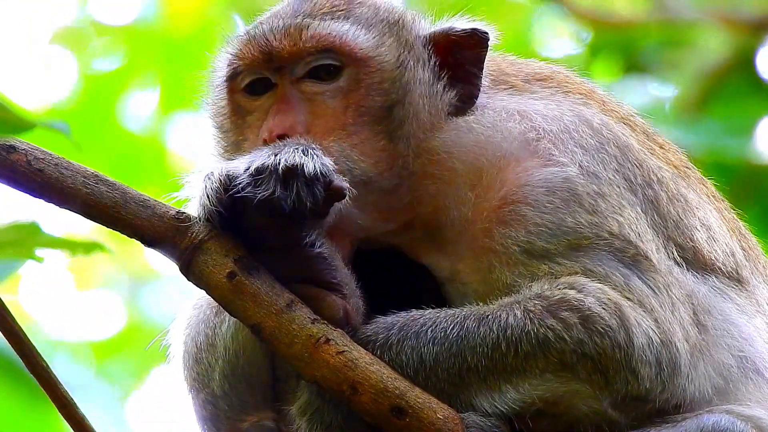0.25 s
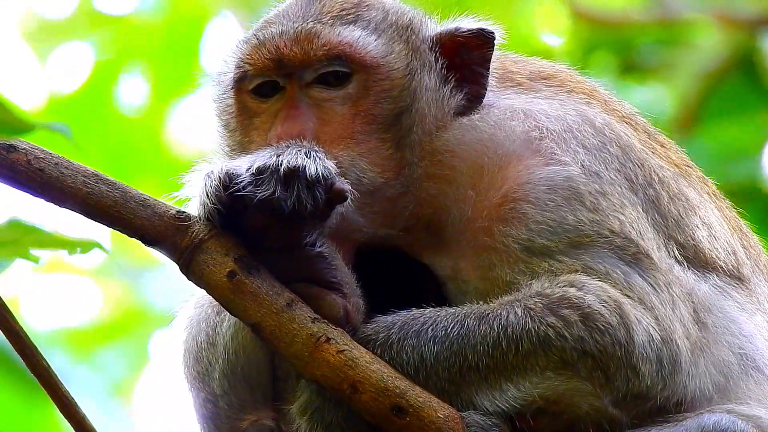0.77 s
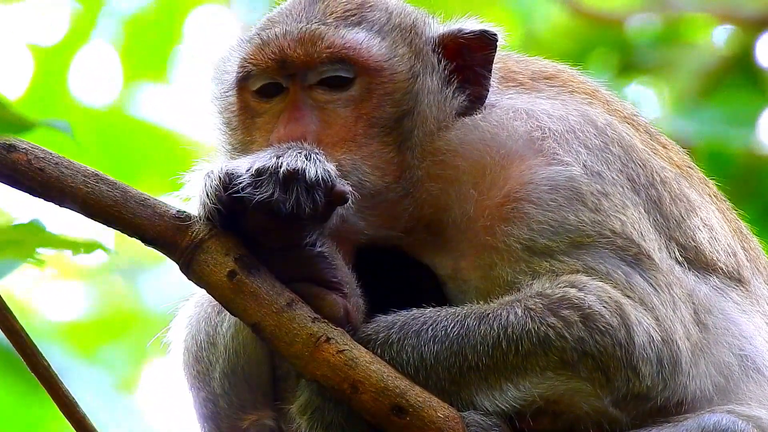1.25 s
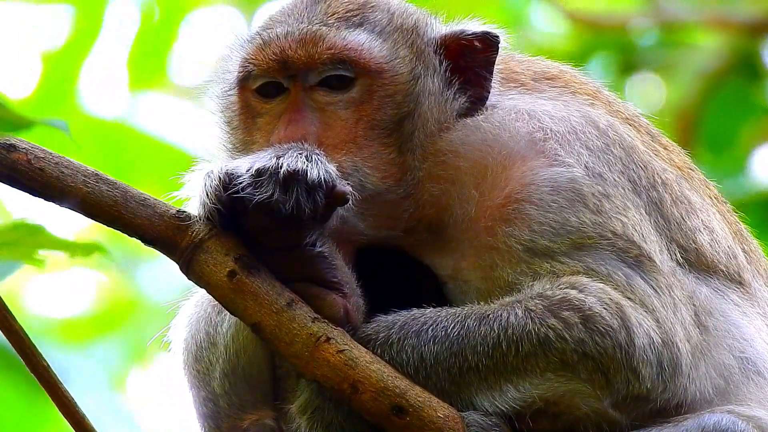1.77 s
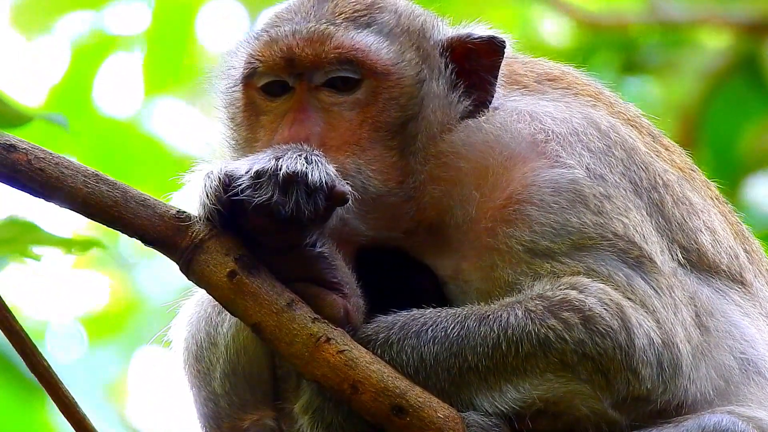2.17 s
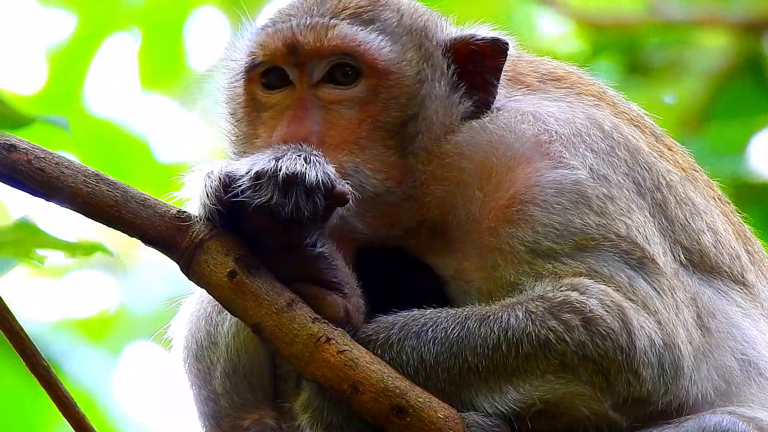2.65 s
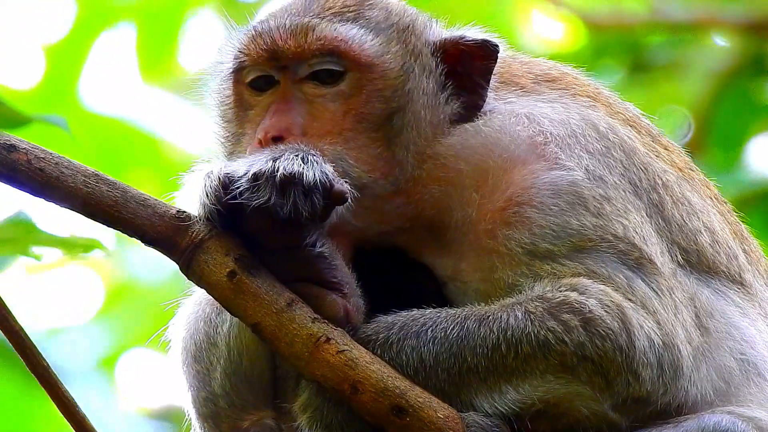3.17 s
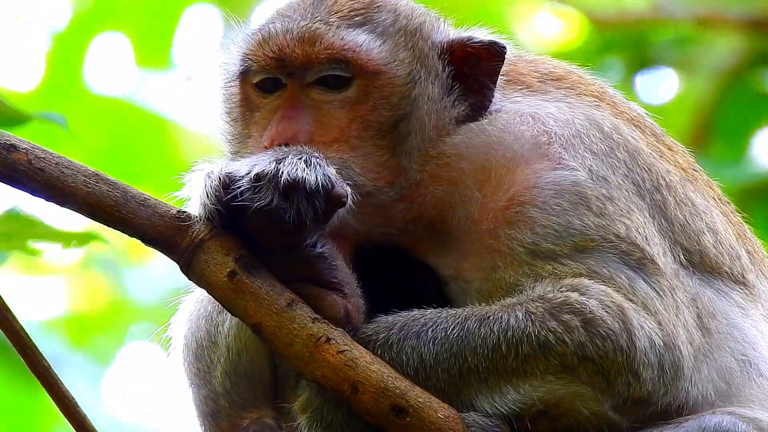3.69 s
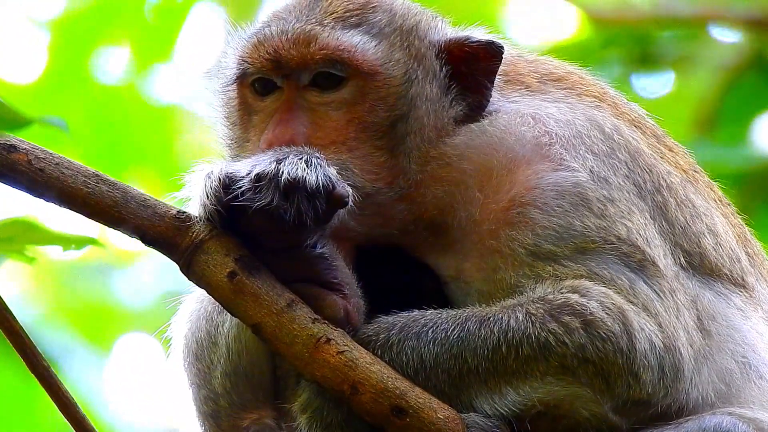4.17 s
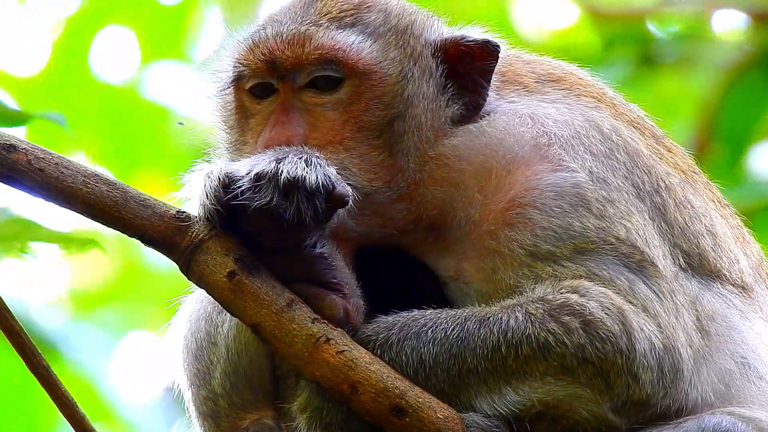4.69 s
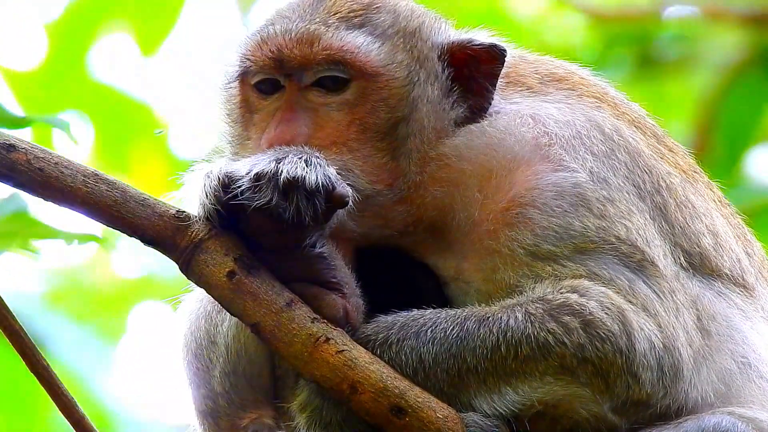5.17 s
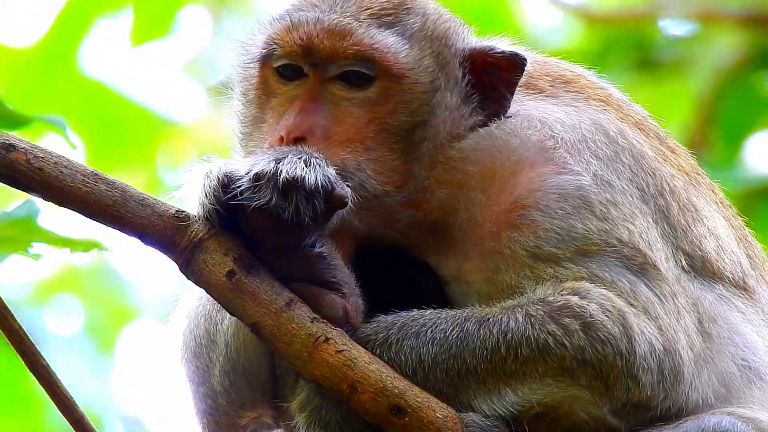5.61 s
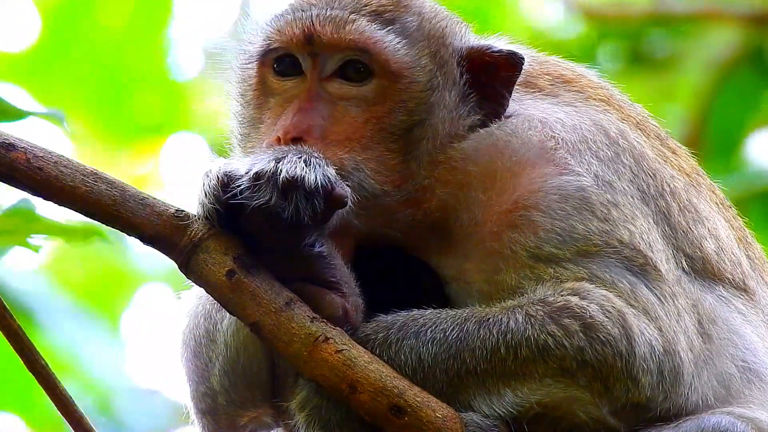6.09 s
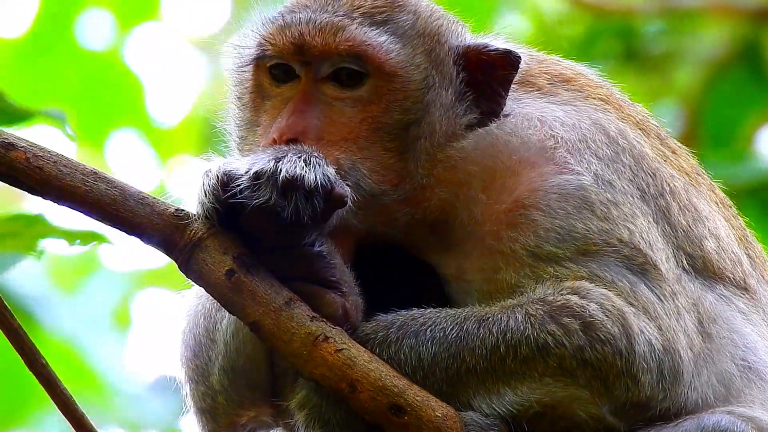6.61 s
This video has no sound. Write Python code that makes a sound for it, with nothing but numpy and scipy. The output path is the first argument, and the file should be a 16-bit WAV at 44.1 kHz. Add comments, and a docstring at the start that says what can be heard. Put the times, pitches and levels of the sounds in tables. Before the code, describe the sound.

A wide, bright insect drone dominates throughout, with a closer rhythmic throb on top. Soft lip smacks come in small clusters, followed by a clear bird cry, before an abrupt half-second silence. The drone returns a little stronger, with a few more smacks, another cry, scattered echoing whistles, thin high lisps and crackling leaves. Light wind rumbles low beneath, captured in open woodland with a diffuse, leafy echo.

```python
"""A shrill insect chorus fills a forest, with one nearer insect throbbing about four times a second.
Far birds whistle through the trees, a monkey smacks its lips, leaves rustle and light wind rumbles.
Insects are filtered clicks and noise, birds gliding sines with a scattered tail, smacks bursts shaped
by mouth resonances, leaves and wind coloured noise.
The sound cuts out for half a second and comes back a little louder."""
import sys
import numpy as np
from scipy import signal
from scipy.fft import rfft, irfft, next_fast_len
from scipy.io import wavfile
from scipy.ndimage import uniform_filter1d

SR = 44100
rng = np.random.default_rng(int(sys.argv[2]) if len(sys.argv) > 2 else 0)


def store_wav(level_fs):
    """Save 16-bit WAV to argv[1]."""
    pcm = np.round(np.clip(np.atleast_2d(level_fs), -1, 1) * 32767)
    wavfile.write(sys.argv[1], SR, pcm.T.astype(np.int16))


N = 302085
TIME = np.arange(N) / SR

# Mean levels of the steady layers, joined by straight lines.
# Each row: time in seconds, insect chorus in dB, forest wash in dB, wind in dB.
LAYER_LEVELS = [(0, -41, -58, -45), (1, -40.5, -56, -48.5), (2.501, -40.5, -54, -46),
                (2.999, -37.5, -56, -44.5), (4.3, -38, -56, -46), (5.5, -37.5, -54.5, -46),
                (6.85, -38.5, -56.5, -44.5)]


def gain_of(db):
    """Decibels to amplitude."""
    return 10 ** (np.asarray(db) / 20)


def evened(x):
    """Scales to rms 1."""
    return x / np.sqrt(np.mean(x ** 2) + 1e-20)


def read(points, hz):
    """Reads a curve of (Hz, value) points on a log-frequency axis."""
    f, value = np.transpose(points)
    return np.interp(np.log(hz + 1), np.log(f + 1), value)


def add(mix, s, sound):
    """Mixes a sound in at time s."""
    part = mix[max(round(s * SR), 0):][:len(sound)]
    part += sound[:len(part)]


def sine(hz):
    """A sine that follows a moving pitch."""
    return np.sin(2 * np.pi * np.cumsum(hz) / SR)


def noise_pair():
    """Two unrelated channels of white noise."""
    return rng.standard_normal((2, N))


def wander(rate_hz):
    """Smooth chance of rms 1, moving up to roughly the given rate."""
    size = next_fast_len(N)
    hz = np.fft.rfftfreq(size, 1 / SR)
    slow = rfft(rng.standard_normal(size)) * np.exp(-(hz / rate_hz) ** 2)
    return evened(irfft(slow, size)[:N])


def spread(pair, spectrum):
    """Colours two unrelated signals and makes them partly alike, as sound from all around."""
    # Stereo width over pitch. Each row: frequency in Hz, left-right likeness (1 alike, negative opposed).
    likeness = [(60, 1), (200, 0.8), (450, 0.53), (900, 0.6), (3300, 0.44), (4500, 0.54), (6400, 0.27),
                (8200, -0.03), (9800, -0.32), (12000, -.33), (15000, .15)]
    size = next_fast_len(N)
    hz = np.fft.rfftfreq(size, 1 / SR)
    a, b = rfft(pair, size)
    same = np.clip(read(likeness, hz), -1, 1)
    z = np.array([a, same * a + np.sqrt(1 - same ** 2) * b])
    z = z * gain_of(read(spectrum, hz))
    return evened(irfft(z, size)[:, :N])


def arch(s, length, edge):
    """Sample indices and soft-edged envelope of one event."""
    at = np.arange(int(s * SR), min(int((s + length) * SR), N))
    return at, signal.windows.tukey(len(at), min(edge, 1))


def trees(x, t60, wet_db, same):
    """Trunks and leaves scatter a sound into a long tail of sparse random echoes."""
    t = TIME[:SR]
    echoes = rng.standard_normal((2, SR)) * (rng.random((2, SR)) < .1)
    a, b = echoes * gain_of(-60 * t / t60)
    same = np.clip(same, 0, 1)
    tail = np.array([a, same * a + np.sqrt(1 - same ** 2) * b])
    tail = tail * gain_of(wet_db) / np.linalg.norm(a)
    tail[:, 0] += 1  # the direct sound
    return signal.fftconvolve(x[None], tail / np.linalg.norm(tail[0]), axes=1)[:, :N]


def patchy(x, patchy_db, order=9):
    """Many faint far voices come and go: narrow patches of the spectrum swell and sink."""
    z = signal.stft(x, nperseg=1024, noverlap=768)[2]
    field = rng.standard_normal(z.shape[1:])
    field = uniform_filter1d(field, size=order, axis=1)  # smooth in time
    field = evened(uniform_filter1d(field, size=3, axis=0))  # and in frequency
    patches = z * gain_of(patchy_db * field)
    return evened(signal.istft(patches, nperseg=1024, noverlap=768)[1][:, :N])


def drones():
    """Distant tones of slightly unsteady pitch that fade in and out."""
    # Faint far tones. Each row: start in seconds, length in seconds, pitch in Hz,
    # peak level in dB before the shared wavering, pitch scatter in Hz.
    tones = [(0, 1.96, 816, -63.5, 18.4), (0, 1.25, 118.7, -48.5, 6.5), (3.4, 3.2, 205.2, -59.5, 9.03),
             (5.694, 1.9, 645, -62.5, 16.2)]
    out, waver = np.zeros(N), wander(45.7)
    for s, length, hz, db, scatter in tones:
        at, shape = arch(s, length, 0.091)
        out[at] += gain_of(db) * shape * sine(hz + scatter * waver[at])
    return out * gain_of(4.6 * wander(9.8))


def air():
    """Lumpy low wind under the soft, uneven wash of the forest."""
    # Colour of the low wind. Each row: frequency in Hz, relative level in dB per Hz.
    wind_colour = [(18, -18), (35, -21), (55, -5.5), (75, -0.5), (105, 0), (125, -1.5), (142, -7),
                   (165, -7), (188, -7), (205, -6), (235, -17.5), (330, -24.5), (700, -49)]
    # Colour of the forest wash. Each row: frequency in Hz, relative level in dB per Hz.
    forest_colour = [(100, -5.5), (290, -0.5), (400, 0.5), (640, 0.5), (760, -1.5), (900, -4.5), (1100, -4),
                     (1500, -7), (2100, -5.5), (2700, -6), (3500, -5), (6000, -39)]
    # Low swells and bumps. Each row: start in seconds, length in seconds, pitch in Hz, level in dB.
    low_bumps = [(1.6, 0.43, 97.4, -43), (2.215, 0.055, 160.4, -43), (3.08, 0.057, 160, -35),
                 (3.16, 0.079, 161, -44.5)]
    s, _, forest_db, wind_db = np.transpose(LAYER_LEVELS)
    wash = patchy(spread(noise_pair(), forest_colour), patchy_db=4.0)
    wash = wash * gain_of(np.interp(TIME, s, forest_db) + 1.0 * wander(9.8))
    wind = spread(noise_pair(), wind_colour)
    wind = wind * gain_of(np.interp(TIME, s, wind_db) + 1.0 * wander(33))
    for s, length, hz, db in low_bumps:
        at, shape = arch(s, length, 0.63)
        tone = np.sin(2 * np.pi * hz * (TIME[at] - s))
        wind[:, at] += gain_of(db) * shape * evened(tone)
    return wash + wind + drones()


def leaves():
    """Brushed leaves give clumps of fine crackle that swell and die away."""
    # Strokes through the leaves. Each row: start in seconds, time to the crest in seconds,
    # crest level in dB before the crackle.
    brushes = [(1.19, 0.035, -55), (2.036, 0.0058, -49), (3.49, .15, -53.5), (5.33, 0.031, -44),
               (5.367, 0.0072, -42.5), (5.43, 0.03, -50), (6.09, 0.13, -51)]
    # Colour of the leaves. Each row: frequency in Hz, relative level in dB per Hz.
    leaf_colour = [(400, 0.5), (1400, -13.5), (2800, -5), (4200, -9.5), (5700, 8.5), (6900, 4), (8200, -9),
                   (11000, -19), (16000, -48.5)]
    level = np.zeros(N)
    for s, crest, db in brushes:
        age = np.maximum(TIME - s, 0) / crest
        level += gain_of(db) * (age * np.exp(1 - age)) ** 0.76  # below 1 broadens the swell
    return spread(noise_pair(), leaf_colour) * level * gain_of(2.8 * wander(120))


def smacks():
    """Parting lips release a brief wet burst into the hollow of the mouth."""
    # Lip smacks. Each row: start in seconds, dry level in dB, decay in seconds,
    # factor on the mouth resonances.
    lip_smacks = [(1.316, -47.5, 0.0073, 1), (1.405, -40.5, 0.0024, 1.12), (1.476, -45.5, 0.0067, 1),
                  (1.499, -47.5, 0.018, 0.71), (2.03, -36, .0035, 1.06), (2.224, -35.5, 0.0026, 1.06),
                  (2.322, -37.5, 0.0062, 0.956), (3.104, -47.5, 0.0035, .96), (3.144, -38, 0.0028, 1.13),
                  (5.372, -43, 0.0042, 1.43), (6.38, -46.5, 0.0098, 0.95)]
    # Resonances of the mouth. Each row: centre in Hz before that factor, width in Hz, relative level in dB.
    resonances = [(585, 190, 0), (881, 110, 10.5), (1130, 330, -3.5), (1596, 300, -10.5),
                  (2000, 610, -18.5)]
    out, t = np.zeros(N), TIME[:8192]
    hz = np.fft.rfftfreq(len(t), 1 / SR)
    for s, db, decay, factor in lip_smacks:
        mouth = sum(gain_of(d) / (1 + (2 * (hz - f * factor) / w) ** 2) for f, w, d in resonances)
        random_phase = np.exp(2j * np.pi * rng.random(len(hz)))
        burst = evened(irfft(mouth * random_phase))
        add(out, s, gain_of(db) * burst * t / decay * np.exp(1 - t / decay))
    return trees(out, t60=0.2, wet_db=-7, same=0.64)


def buzzes():
    """Thin, high lisping notes whose pitch flutters too fast to follow."""
    # High lisps. Each row: start in seconds, length in seconds, pitch in Hz,
    # level in dB before the trees.
    lisps = [(1.04, 0.074, 6640, -52), (1.27, 0.08, 6660, -52), (2.294, 0.11, 6600, -54.5),
             (2.981, 0.055, 6400, -55), (4.46, .075, 6600, -56), (4.742, 0.27, 6660, -47),
             (4.987, 0.2, 6790, -47)]
    out, flutter = np.zeros(N), wander(790)
    for s, length, hz, db in lisps:
        at, shape = arch(s, length, 0.19)
        out[at] += gain_of(db) * shape * evened(sine(hz + 175 * flutter[at]))
    return trees(out, t60=0.68, wet_db=4.0, same=.3)


def distant_birds():
    """Faint short notes from deep in the forest, in spells, each at its own pitch."""
    # Spells of answering notes. Each row: start in seconds, end in seconds, notes in the spell,
    # lowest base pitch in Hz, highest base pitch in Hz, loudest level in dB before the trees.
    note_spells = [(1.001, 1.4, 4.5, 2300, 2560, -54), (3.1, 3.701, 6, 2090, 3110, -54),
                   (3.6, 6.751, 56, 1046, 3134, -54.5)]
    note_s, glide_share, range_db, rasp_hz = .09, .126, 12, 25
    out, waver = np.zeros(N), wander(200)
    for start, end, notes, low_hz, high_hz, db in note_spells:
        chances = rng.random(size=(100, 4))[:round(notes)]
        for k, (when, pitch, glide, size) in enumerate(chances):
            s = start + (k + when) / notes * (end - start)
            at, shape = arch(min(s, TIME[-1] - note_s), note_s, 0.81)
            base_hz = low_hz * (high_hz / low_hz) ** pitch
            hz = base_hz * (1 + glide_share * (glide - .5) * np.linspace(-1, 1, len(at)))
            out[at] += gain_of(db - range_db * size) * shape * sine(hz + rasp_hz * waver[at])
    return trees(out, t60=1.0, wet_db=0.5, same=0.94)


def birds():
    """Far whistles and cries, gliding sines roughened by pitch scatter and smeared by the trees."""
    # The clearest whistles. Each row: start in seconds, length in seconds, first pitch in Hz,
    # last pitch in Hz, level in dB before the trees, rasp as pitch scatter in Hz.
    whistles = [(0.861, 0.37, 2735, 2735, -63, 51), (1.388, 0.14, 2554, 2615, -55.5, 40),
                (1.513, 0.26, 2720, 2835, -58.5, 55), (1.524, .39, 3025, 3380, -61, 45),
                (2.259, 0.13, 2630, 2120, -57, 170), (2.934, .11, 3930, 3775, -44.5, 64),
                (3.055, 0.38, 3182, 2963, -54, 47), (3.293, 0.1, 2713, 2670, -48.5, 16),
                (3.742, .11, 3080, 3110, -54.5, 20), (3.805, .29, 2660, 2840, -59.5, 38),
                (4.58, 0.066, 2180, 2510, -53.5, 160), (5.017, .11, 2730, 2400, -55.5, 33),
                (5.145, 0.032, 2306, 2220, -49.5, 25), (5.16, 0.47, 3103, 3075, -55, 79),
                (5.397, 0.37, 4180, 3975, -49.5, 86), (5.62, 0.072, 1185, 1160, -54.5, 8.1),
                (6.645, 0.083, 2455, 2357, -50.5, 30), (6.793, .09, 1750, 1560, -52.5, 28)]
    # Loud calls of one bird. Each row: start in seconds, length in seconds, middle pitch in Hz,
    # level in dB before swell and trees, rasp as pitch scatter in Hz.
    loud_cries = [(2.086, 0.1496, 1659, -38.5, 24.95), (4.39, 0.1154, 1681, -35.5, 42.7)]
    out, waver = np.zeros(N), wander(255)
    for s, length, first_hz, last_hz, db, rasp in whistles:
        at, shape = arch(s, length, 0.082)
        hz = np.linspace(first_hz, last_hz, len(at)) + rasp * waver[at]
        out[at] += gain_of(db) * shape * evened(sine(hz))
    for s, length, pitch_hz, db, rasp in loud_cries:
        at, shape = arch(s, length, 0.24)
        hz = pitch_hz + np.linspace(22, -22, len(at)) + rasp * waver[at]
        shape = shape * gain_of(np.linspace(-6, 1, len(at)))  # each cry swells to its end
        voice = sine(2 * hz) + gain_of(-13) * sine(hz)  # strongest on the second harmonic
        out[at] += gain_of(db) * shape * evened(voice)
    return trees(out, t60=1.0, wet_db=1.5, same=0.81)


def ticks(count=60):
    """The near insect gives short, pure strokes: a few loud ones, softer ones at random."""
    # The loudest strokes. Each row: time of the crest in seconds, peak level in dB before the trees.
    loud_strokes = [(.229, -25.5), (.499, -24.5), (1.601, -26), (1.866, -23.5), (2.283, -29),
                    (3.088, -24.5), (3.39, -26), (3.701, -26), (5.465, -29), (6.825, -27.5)]
    soft_per_s, soft_db, soft_spread_db = 4.0, -29.5, 0.9
    out, t = np.zeros(N), np.arange(-500, 500) / SR
    soft_strokes = []
    for k in range(count):  # one at a random moment of each time slot
        s = (k + rng.random()) / soft_per_s
        soft_strokes.append((s, soft_db + soft_spread_db * rng.standard_normal()))
    for s, db in soft_strokes + loud_strokes:
        detune, phase = rng.standard_normal(2)
        turns = (4640 + 70 * detune) * t - 15000 * t ** 2 + phase  # pitch falls through the stroke
        add(out, s + t[0], gain_of(db) * np.exp(-(t / 0.0019) ** 2) * np.sin(2 * np.pi * turns))
    return trees(out, t60=0.92, wet_db=-8, same=0.92)


def throbs():
    """The near insect swells at an even pace within each bout, each throb a little stronger or weaker."""
    # Bouts of throbbing. Each row: first throb in seconds, end of bout in seconds,
    # throbs per second, mean crest level in dB.
    throb_bouts = [(.226, 2.5, 3.64, -39.5), (3.125, 6.1, 3.44, -40.5), (5.64, 6.85, 4.6, -39.5)]
    decay_s, spread_db = .046, .7
    swell = np.zeros(N)
    for first, end, rate, db in throb_bouts:
        for s, chance in zip(np.arange(first, end, 1 / rate), rng.standard_normal(size=16)):
            swell += gain_of(db + spread_db * chance) * np.exp(-abs(TIME - s) / decay_s)
    return swell


def near_insect():
    """A narrow band of noise swells in rhythm with a rough flutter, dotted with pure strokes."""
    # Each row: frequency in Hz, relative level in dB per Hz.
    band = [(3600, -38.5), (4300, -1.5), (4650, 0.0), (5100, -7.0), (5800, -30.5), (8000, -56.0)]
    song = spread(noise_pair(), band) * throbs() * gain_of(2.0 * wander(59))
    return song + ticks()


def chorus():
    """Thousands of tymbal clicks a second from massed insects ring near one pitch."""
    # Colour of the massed insects. Each row: frequency in Hz, relative level in dB per Hz.
    mass_colour = [(3300, -43), (3600, -31), (3920, -17.5), (4250, -6), (4520, .5), (4950, -2.5),
                   (5500, -15.5), (6100, -20.5), (6700, -23.5), (7700, -32.5), (9000, -30), (10000, -34.5),
                   (13000, -37.5), (15600, -58)]
    clicks = noise_pair() * (rng.random((2, N)) < 9000 / SR)
    s, level_db, _, _ = np.transpose(LAYER_LEVELS)
    level_db = np.interp(TIME, s, level_db) + 0.42 * wander(60)
    return spread(clicks, mass_colour) * gain_of(level_db)


def scene():
    """All sources; a nearby surface gives the insects one quick echo."""
    insects = chorus() + near_insect()
    insects = insects + .18 * np.roll(insects, round(.0032 * SR), axis=1)
    singers = insects + birds() + distant_birds() + buzzes()
    singers = singers * gain_of([[.3], [-.3]])  # dB, a slight lean to the left
    return singers + smacks() + leaves() + air()


def record(dry):
    """The sound cuts out for half a second and snaps back; then a low-pass limits the treble."""
    gap_start, gap_end, fade_s = 2.497, 2.995, .005
    heard = np.clip((gap_start - TIME) / fade_s, 0, 1) + (TIME > gap_end)
    low_pass = signal.firwin(511, 15750, window=("kaiser", 9), fs=SR)  # edge in Hz
    return signal.oaconvolve(dry * heard, low_pass[None], "same")


dry = scene()
out = record(dry)
store_wav(out)
```